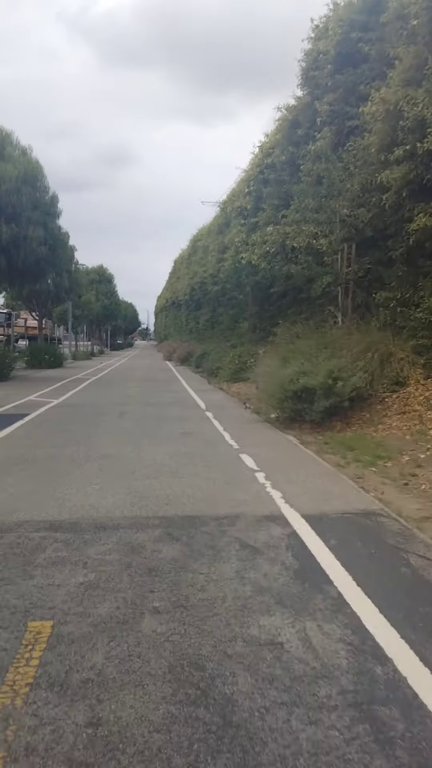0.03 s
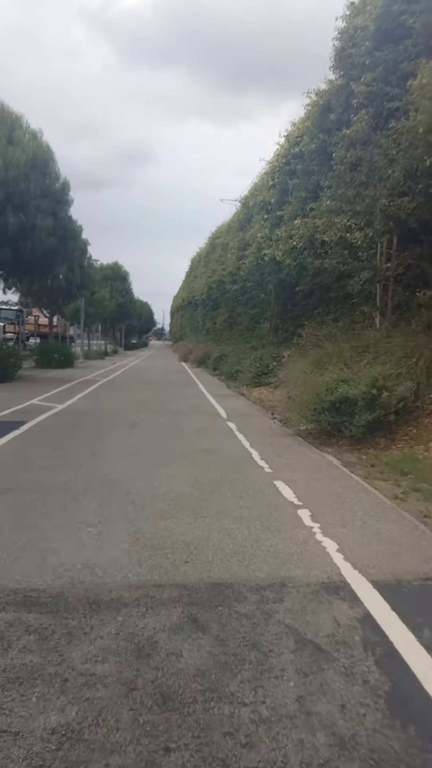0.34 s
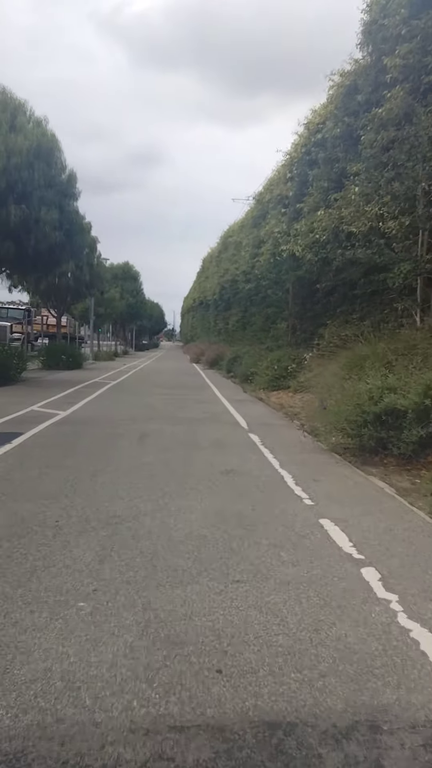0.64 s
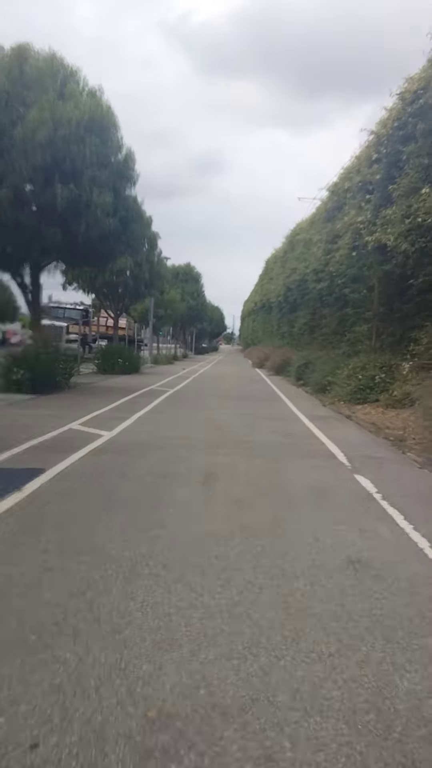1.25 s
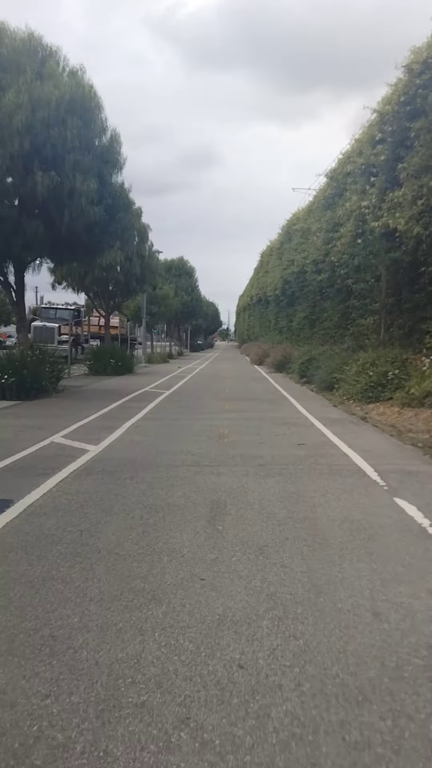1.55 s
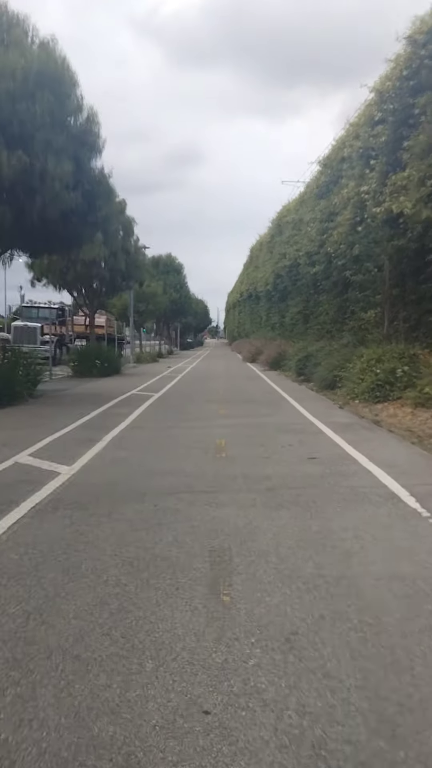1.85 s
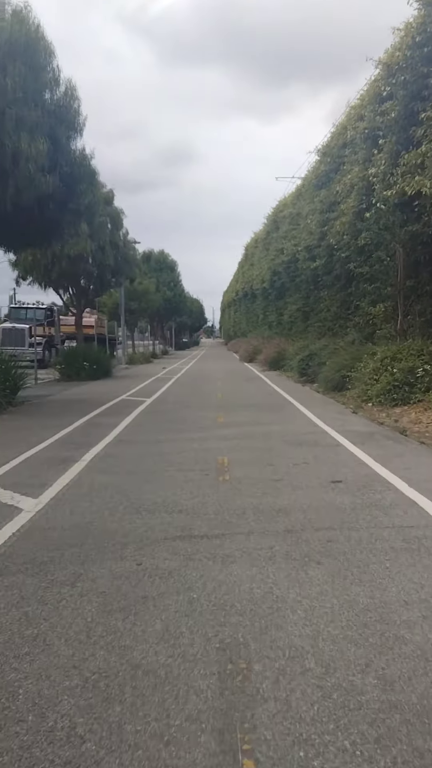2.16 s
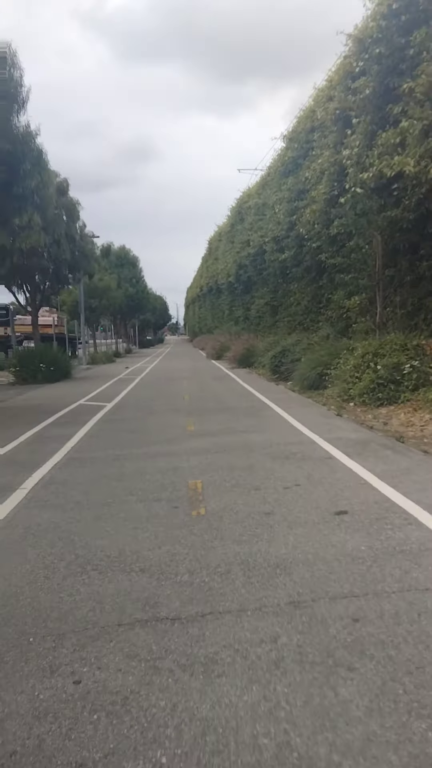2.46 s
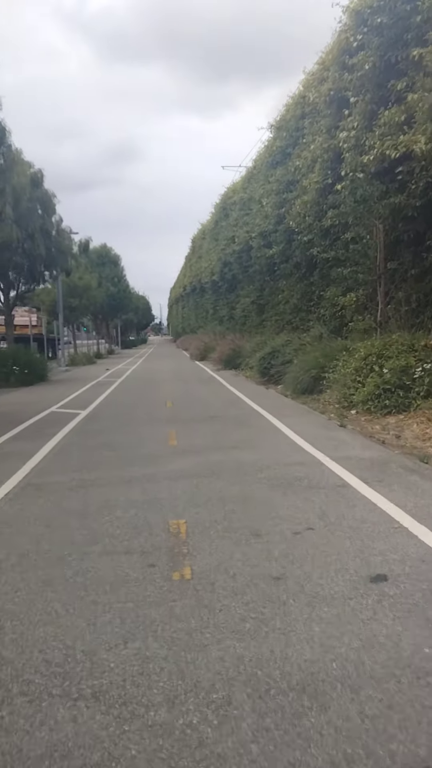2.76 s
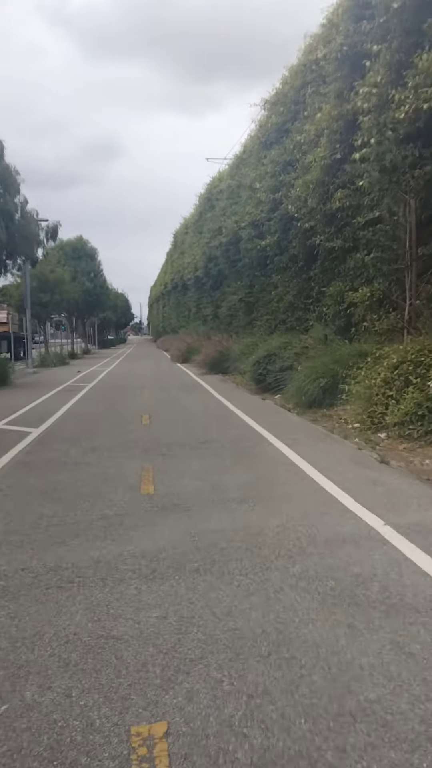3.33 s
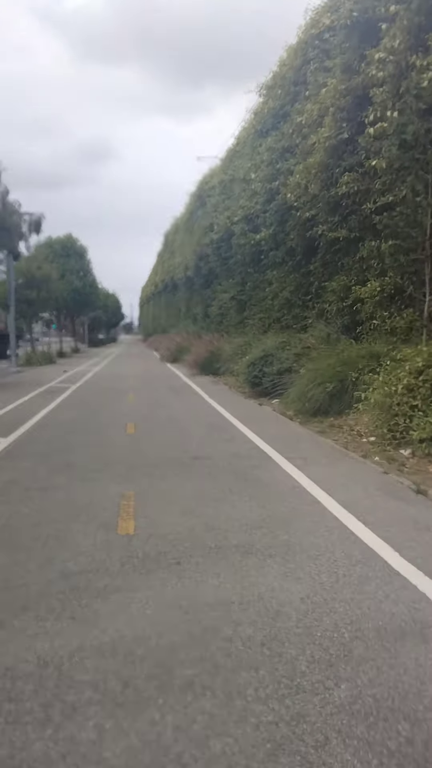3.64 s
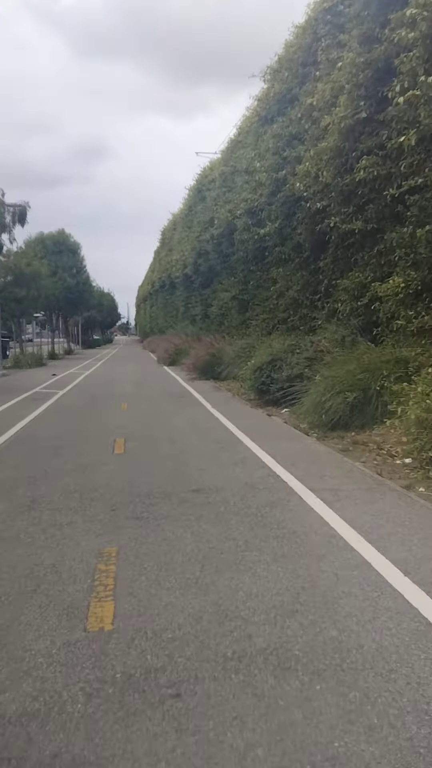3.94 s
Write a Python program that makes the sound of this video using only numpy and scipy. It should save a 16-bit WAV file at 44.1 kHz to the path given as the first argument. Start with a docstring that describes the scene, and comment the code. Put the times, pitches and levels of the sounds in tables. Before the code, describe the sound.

Bicycle riding along a paved path, with wind rumble, tyre hiss and squeaky drivetrain chirps.

```python
"""A bicycle on a paved path, heard close up from the two microphone ports of the rider's camera.
From the start wind rumbles on both; the right port is covered, so the bicycle is heard on the left.
Tyres hiss, the chain sizzles with the crank, and the dry drivetrain chirps and ticks. Within the first
second the pedal strokes begin to squeak, metal pings thinly, puffs of wind strike and a part rubs.
The hiss swells once, the treble dips briefly twice, and raspy squeals join in towards the end."""
import sys
import numpy as np
from scipy import signal
from scipy.fft import rfft, irfft, next_fast_len
from scipy.io import wavfile
from scipy.ndimage import uniform_filter1d, minimum_filter1d, map_coordinates

SR = 44100
rng = np.random.default_rng(int(sys.argv[2]) if len(sys.argv) > 2 else 0)


def wav_record(signal):
    """Record a signal, one row per channel, as 16-bit PCM in the file named by sys.argv[1]."""
    frames = np.transpose(np.atleast_2d(signal))
    bounded = np.clip(frames, -1, 1)
    # unit amplitude maps onto the largest positive 16-bit level
    quanta = np.round(bounded * 32767).astype(np.int16)
    wavfile.write(sys.argv[1], SR, quanta)


N = 176400


def amp(db):
    """Decibels to gain."""
    return 10 ** (np.asarray(db) / 20)


def unit(x):
    """Scale to rms 1."""
    return x / np.sqrt(np.mean(x ** 2) + 1e-20)


def clock():
    """Time of every sample, in seconds."""
    return np.arange(N) / SR


def wobble(rate):
    """A smooth random curve, rate knots a second."""
    return map_coordinates(rng.standard_normal(8192), [clock() * rate + 2], mode="wrap")


def filtered(x, response):
    """Filter x by a gain given as a function of frequency."""
    size = next_fast_len(N + SR // 2)
    return irfft(rfft(x, size) * response(np.fft.rfftfreq(size, 1 / SR)), size)[..., :N]


def noise(spectrum):
    """Noise of rms 1 coloured by rows of freq_hz, gain_db."""
    freq_hz, gain_db = np.transpose(spectrum)
    white = rng.standard_normal(N)
    return unit(filtered(white, lambda hz: amp(np.interp(np.log(hz + 1), np.log(freq_hz), gain_db))))


def even(x, size):
    """Even out the slow swells of a noise over size samples."""
    return x / np.sqrt(np.abs(uniform_filter1d(uniform_filter1d(x * x, size), size)) + 0.01)


def bell(centre_s, length_s):
    """A swell with steep flanks whose energy spans about length_s."""
    return np.exp(-2 * np.minimum(np.abs((clock() - centre_s) / length_s) ** 1.9, 20))


def stick_slip(centre_s, half_s, hz, glide_hz=0, arch=0):
    """One friction note: it swells for half_s and fades for half_s; its pitch can glide and arch."""
    note = np.zeros(N)
    span = slice(max(0, int((centre_s - half_s) * SR)), int((centre_s + half_s) * SR))
    t = clock()[span] - centre_s
    pitch_hz = hz + glide_hz * t / half_s - arch * t ** 2
    envelope = np.cos(np.pi / 2 * t / half_s) ** 2
    note[span] = np.sqrt(2) * envelope * np.sin(2 * np.pi * np.cumsum(pitch_hz) / SR)
    return note


def roughen(x, rate, rough, jitter_s):
    """Uneven grip shakes a note's level and phase."""
    return np.interp(clock() + jitter_s * wobble(rate), clock(), x) * (1 + rough * wobble(rate))


# Spectra of the air flowing over the open and the covered port: freq_hz, gain_db
AIR_OPEN = [(15, -6), (65, -0.5), (200, -14), (500, -25), (2000, -65)]
AIR_COVERED = [(15, -7), (60, 2), (110, -0.5), (170, -30), (400, -19.5), (600, -43.5), (8000, -76),
               (14500, -66)]

def wind_rumble():
    """Air rumbles right on each port, left then right; under the cover only the bass surges."""
    left = unit(even(noise(AIR_OPEN), size=2000) * amp(3.5 * wobble(35)))
    covered = even(noise(AIR_COVERED), size=2000)
    bass = filtered(covered, lambda hz: hz < 200)
    right = unit(bass * amp(5.5 * wobble(24))) + covered - bass
    return np.array([amp(-26.5) * left, amp(-28.5) * right])


# Spectrum of the tyres on asphalt: freq_hz, gain_db
TYRE_SPECTRUM = [(150, 8), (500, 14.5), (1500, 7.5), (3000, 2), (6700, 0.5), (8000, -12.5), (12000, -16.5),
                 (15000, -10)]
# Their hiss along the path: time_s, level_db
TYRE_LEVEL = [(0, -43), (.85, -45.5), (1.26, -42.5), (1.45, -42.5), (3.7, -46.5), (4, -40.5)]

def tyres():
    """Tyres hiss on coarse asphalt below the camera, with one brighter swell."""
    level_db = np.interp(clock(), *np.transpose(TYRE_LEVEL))
    hiss = amp(level_db + 1.16 * wobble(8.8)) * noise(TYRE_SPECTRUM)
    swell = amp(-52.5) * bell(centre_s=1.237, length_s=0.15) * rng.standard_normal(N)
    return (hiss + swell) * amp(1.8 * wobble(130))


# Resonances of the chain's links: pitch_hz
LINK_MODES = [4833, 7240, 8690, 10250, 11600, 12800, 14300]

def chain(width_hz=150, turn_s=1.13, peak_s=0.53):
    """Links rattle over the sprockets and ring, swelling once in each turn of the crank."""
    def links(hz):
        return sum(1 / (1 + 2j * (hz - mode) / width_hz) ** 2 / mode for mode in LINK_MODES)
    rattle = rng.standard_normal(N) * amp(5.5 * wobble(150))
    level_db = -63 + 6.5 * np.cos(2 * np.pi * (clock() - peak_s) / turn_s)
    return unit(filtered(rattle, links)) * amp(level_db)


ARCH_HZ_PER_S2 = 150000  # bends the pitch down at both ends of a chirp or squeal
# Friction chirps of the drivetrain: centre_s, pitch_hz, glide_hz, level_db
CHIRPS = [(0.009, 2190, -220, -34.5), (0.191, 2160, -300, -39), (0.334, 3030, -150, -50),
          (0.455, 2150, -250, -37.5), (0.695, 2295, -350, -47.5), (0.875, 2330, -180, -38),
          (1.176, 2330, 77, -40), (1.357, 2350, -300, -39.5), (1.655, 2380, -250, -37.5),
          (1.87, 2720, -300, -48), (2.277, 2590, -400, -46), (2.397, 2650, -330, -39),
          (2.524, 2565, 154, -42.5), (3.224, 2280, 37, -42.5), (3.43, 2250, 296, -43.5),
          (3.663, 2250, 304, -41), (3.875, 2250, 348, -40), (3.97, 1727, -5, -41.5)]

def drivetrain_chirps(half_s=0.036, trail_delay_s=0.028):
    """Dry drivetrain parts chirp a few times a second, each trailing off in a softer rasp."""
    notes = sum(amp(db) * stick_slip(s, half_s, hz, glide, ARCH_HZ_PER_S2)
                for s, hz, glide, db in CHIRPS)
    trails = sum(amp(db - 7) * stick_slip(s + trail_delay_s, half_s, hz + glide / 2)
                 for s, hz, glide, db in CHIRPS)
    chirps = roughen(notes, rate=230, rough=0.5, jitter_s=50e-6)
    return chirps + roughen(trails, rate=300, rough=0.5, jitter_s=80e-6)


# Single ticks of the drivetrain: start_s, level_db
TICKS = [(.035, -33), (.454, -36), (.651, -37), (1.05, -37.5), (1.763, -41.5)]
# Spectrum of ticks and grit: freq_hz, gain_db
TICK_SPECTRUM = [(800, 2), (6000, 4), (8500, -7)]

def ticks_and_grit(t60_s=0.026, grit_per_s=79, grit_db=-52.5):
    """Sharp drivetrain ticks over a patter of fine grit, each a fast-dying burst of noise."""
    grit = [(s, grit_db) for s in rng.uniform(0, N / SR, int(grit_per_s * N / SR))]
    hits = np.zeros(N)
    for s, db in list(TICKS) + grit:
        hits[min(int(s * SR), N - 1)] += amp(db) ** 2
    decay = amp(-60 * clock()[:SR // 10] / t60_s)
    power = signal.fftconvolve(hits, decay ** 2)[:N]
    return np.sqrt(np.abs(power)) * noise(TICK_SPECTRUM)


# One squeak to each pedal stroke: centre_s, level_db
PEDAL_SQUEAKS = [(0.285, -33.5), (0.844, -34), (1.407, -36.5), (1.975, -39), (2.541, -31.5), (3.112, -40),
                 (3.682, -33)]

def pedals(pitch_hz=5594, half_s=0.019, blip_s=0.015):
    """Each stroke squeaks and rings after a short, dry, lower blip; one of the pedals scrapes first."""
    scrapes = sum(amp(db - 8.5) * stick_slip(s - 0.097, half_s, pitch_hz, glide_hz=300)
                  for s, db in PEDAL_SQUEAKS[:-1:2])
    blips = sum(amp(db - 7.5) * stick_slip(s - blip_s, blip_s, hz=4890) for s, db in PEDAL_SQUEAKS)
    squeaks = sum(amp(db) * stick_slip(s, half_s, pitch_hz) for s, db in PEDAL_SQUEAKS)
    return blips + frame_ring(roughen(scrapes + squeaks, rate=200, rough=0.45, jitter_s=22e-6))


def frame_ring(squeaks, t60_s=0.15, rise_s=0.0087):
    """Squeaks linger briefly in the metalwork."""
    t = clock()[:SR // 3]
    tail = rng.standard_normal(len(t)) * amp(-60 * t / t60_s) * (1 - np.exp(-t / rise_s))
    return squeaks + amp(-5.5) * signal.fftconvolve(squeaks, tail / np.linalg.norm(tail))[:N]


# Thin metallic pings: centre_s, half_length_s, pitch_hz, level_db
PINGS = [(.213, .03, 13520, -53), (3.585, .03, 13520, -48), (3.575, .015, 10120, -51),
         (3.14, .08, 6885, -56)]

def pings():
    """Now and then a small metal part sings thinly."""
    return sum(amp(db) * stick_slip(s, half_s, hz) for s, half_s, hz, db in PINGS)


# Puffs of wind on the open and the covered port: centre_s, length_s, thump_db, flutter_db
PUFFS_OPEN = [(0.253, 0.014, 7, -4), (0.288, 0.015, -5.5, -13.5), (0.409, 0.021, -9.5, -20),
              (0.598, 0.063, -9.5, -18.5), (0.738, 0.018, -10, -19.5), (1.253, 0.039, -10.5, -15),
              (1.352, 0.013, -17, -8.5), (1.413, 0.017, -14.5, -39), (1.496, 0.013, -12.5, -1.5),
              (1.54, 0.012, -46, -16), (1.613, 0.019, -21.5, -19), (2.004, 0.017, -9.5, -20),
              (2.103, 0.031, -2.5, -12), (2.146, 0.027, -3.5, -1), (2.356, 0.011, -16.5, -19.5),
              (2.446, 0.022, -11.5, -12), (2.506, 0.018, -10, -28.5), (2.607, 0.024, -11.5, -22),
              (2.638, 0.017, -12, -6.5), (2.725, 0.039, -11.5, -17), (2.83, 0.049, -7.5, -22),
              (2.871, 0.0055, -7, -9.5), (2.912, 0.026, -5, -6.5), (3.064, 0.0071, -35, -20.5),
              (3.146, 0.0046, -26, -20), (3.326, 0.06, -19.5, -21.5), (3.837, 0.037, -21, -14),
              (3.921, 0.015, -10, -9)]
PUFFS_COVERED = [(1.026, 0.25, -29.5, -46), (1.166, 0.025, -33, -17), (1.433, 0.095, -21, -42),
                 (1.851, 0.015, -13, -17.5), (1.892, 0.07, -11.5, -32.5), (2.149, 0.097, -19.5, -35.5),
                 (3.261, 0.049, -5, -21), (3.348, 0.02, -34, -20), (3.79, 0.013, -35, -15),
                 (3.83, 0.037, -10.5, -24)]
# Spectra of a puff's thump and flutter at each port: freq_hz, gain_db
THUMP_OPEN = [(15, -29), (65, -4.5), (110, -1.5), (170, -5), (1200, -120)]
THUMP_COVERED = [(15, -3), (60, 7.5), (105, 3), (1400, -120)]
FLUTTER_OPEN = [(100, -17), (180, 0), (300, -1.5), (480, -12), (640, -25.5), (1000, -40), (5000, -120)]
FLUTTER_COVERED = [(120, -22.5), (215, 3), (290, -10), (420, -8.5), (560, -23), (1000, -27.5), (1700, -69)]

def wind_puffs(puffs, thump_spectrum, flutter_spectrum, eddies_db):
    """Eddies strike a port with a low thump and a lumpy flutter; small ones flutter in between."""
    thump_gain = np.sqrt(sum((amp(db) * bell(s, length)) ** 2 for s, length, db, _ in puffs))
    flutter_gain = np.sqrt(sum((amp(db) * bell(s, length)) ** 2 for s, length, _, db in puffs))
    small_eddies = amp(eddies_db + 5.5 * np.minimum(wobble(20), 2))
    lumps = unit(amp(3.3 * wobble(110)))
    thump = even(noise(thump_spectrum), size=500)
    flutter = even(noise(flutter_spectrum), size=180) * lumps
    return thump_gain * thump + np.hypot(flutter_gain, small_eddies) * flutter


# Short dry rubs: centre_s, pitch_hz, level_db
RUBS = [(.595, 4600, -45), (1.03, 4000, -48), (2.567, 4550, -47)]

def rubs(half_s=0.047):
    """Now and then a part rubs, too unevenly to hold a pitch."""
    notes = sum(amp(db) * stick_slip(s, half_s, hz) for s, hz, db in RUBS)
    return roughen(notes, rate=260, rough=0.7, jitter_s=30e-6)


# Brief dips in the treble: centre_s, length_s, depth_db
DIPS = [(1.513, 0.019, 3.5), (2.94, 0.026, 15.5)]

def treble_dips():
    """A gain that briefly lowers the bicycle; against the low wind, the treble seems to dip."""
    return amp(-sum(depth_db * bell(s, length) ** 2 for s, length, depth_db in DIPS))


# Longer squeals of the drivetrain: centre_s, level_db
SQUEALS = [(2.784, -45), (3.066, -43.5), (3.407, -51.5), (3.726, -46.5), (3.902, -46.5)]

def drivetrain_squeals(half_s=0.086, top_hz=2797):
    """Squeals rise and fall in pitch, rasping as the dry parts keep losing their grip."""
    notes = sum(amp(db) * stick_slip(s, half_s, top_hz, arch=ARCH_HZ_PER_S2) for s, db in SQUEALS)
    grip = unit(amp(3 * wobble(60)))
    return roughen(notes * grip, rate=230, rough=0.5, jitter_s=50e-6)


def scene(cover_db=-50):
    """At the rider's camera: wind on both ports, the bicycle close by and shut out on the right."""
    rumble = wind_rumble()
    bicycle = tyres() + chain() + drivetrain_chirps() + ticks_and_grit()
    bicycle += pedals() + pings() + rubs() + drivetrain_squeals()
    bicycle *= treble_dips()
    left_puffs = wind_puffs(PUFFS_OPEN, THUMP_OPEN, FLUTTER_OPEN, eddies_db=-44)
    right_puffs = wind_puffs(PUFFS_COVERED, THUMP_COVERED, FLUTTER_COVERED, eddies_db=-55)
    return rumble + np.array([left_puffs + bicycle, right_puffs + amp(cover_db) * bicycle])


def record(dry):
    """The camera's limiter holds down the strongest puffs; nothing passes above its band limit."""
    ceiling, top_hz = 0.79, 15850
    needed_gain = ceiling / np.maximum(np.abs(dry), ceiling)
    smooth_gain = uniform_filter1d(minimum_filter1d(needed_gain, size=401), size=401)
    return filtered(dry * smooth_gain, lambda hz: hz < top_hz)


dry = scene()
out = record(dry)
wav_record(out)
```